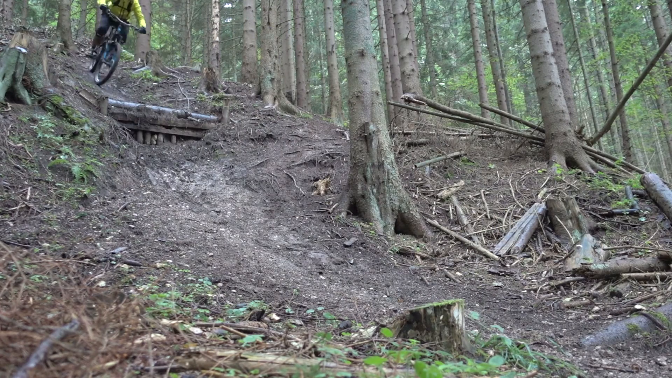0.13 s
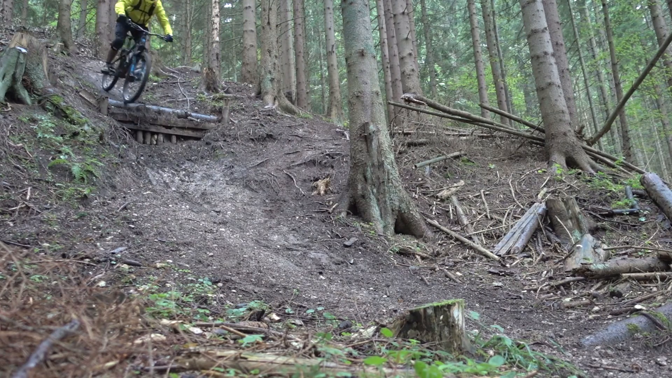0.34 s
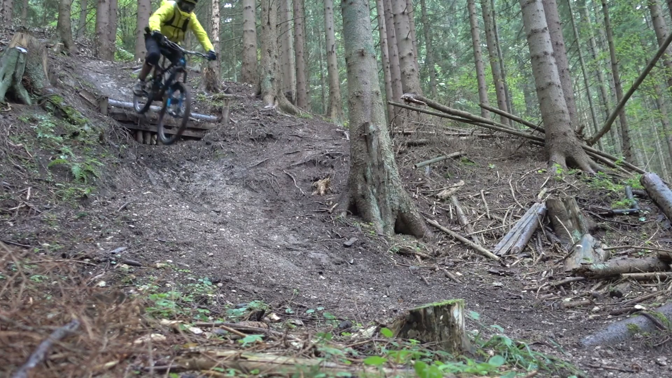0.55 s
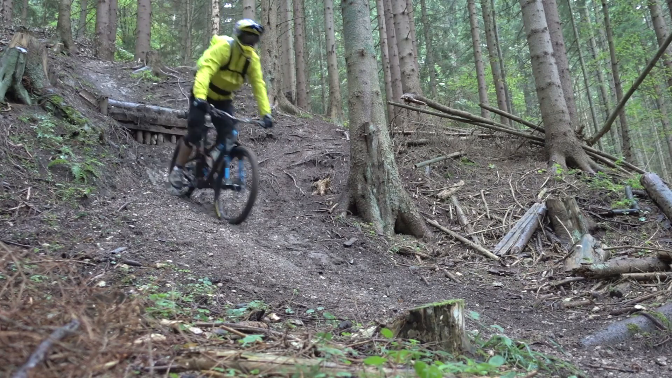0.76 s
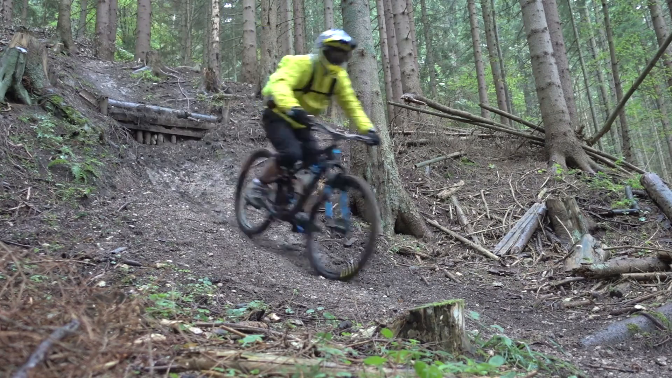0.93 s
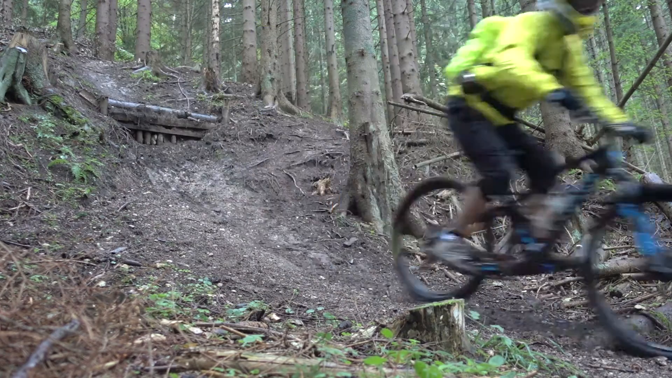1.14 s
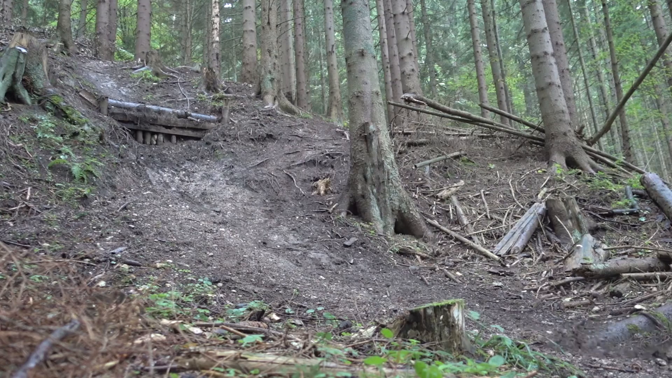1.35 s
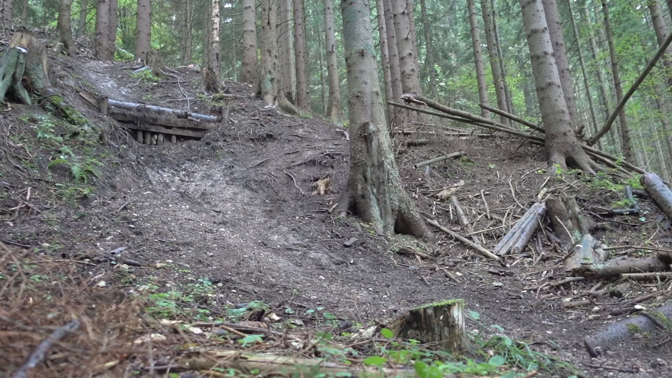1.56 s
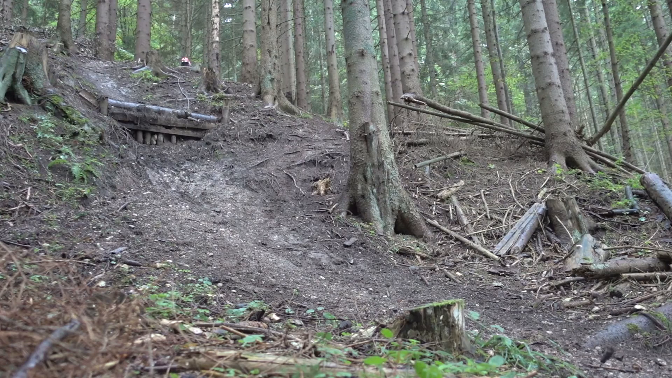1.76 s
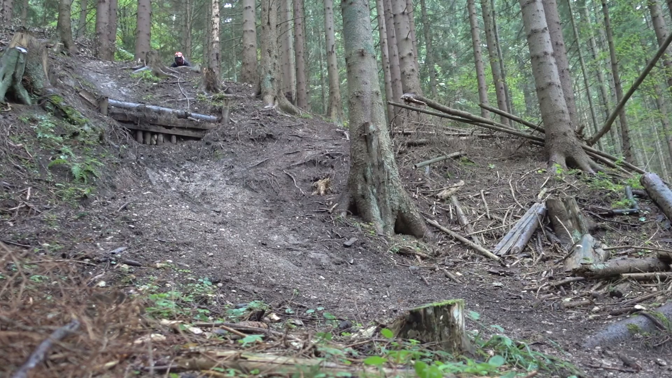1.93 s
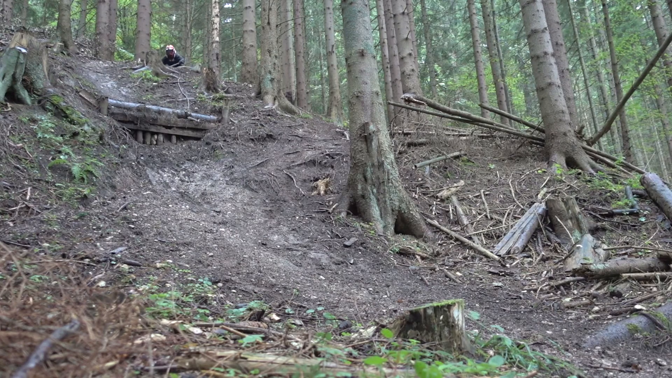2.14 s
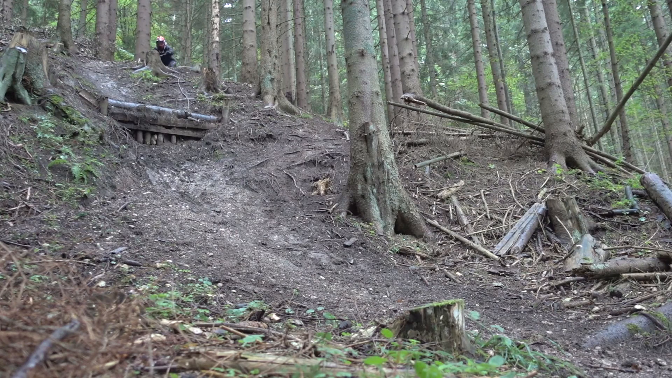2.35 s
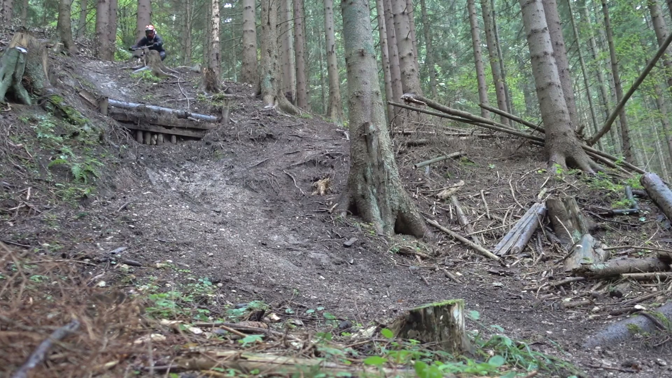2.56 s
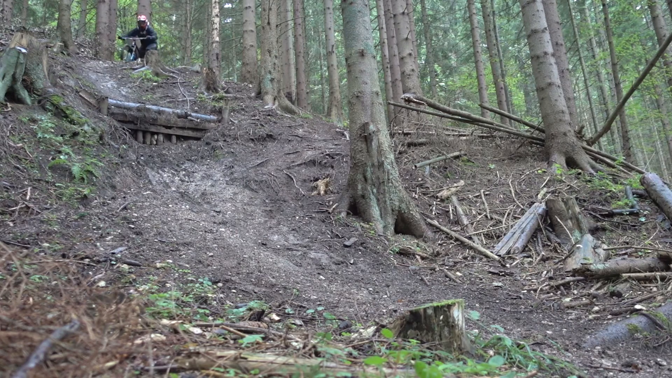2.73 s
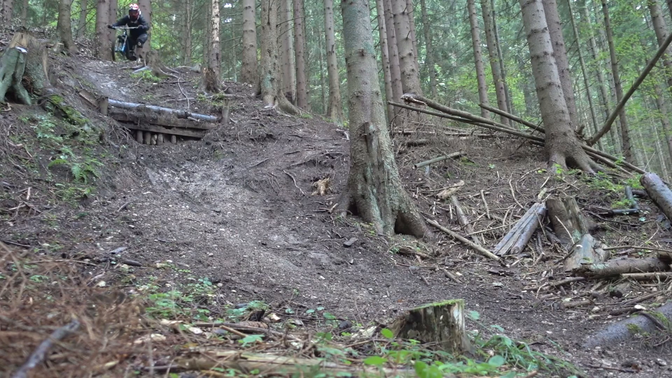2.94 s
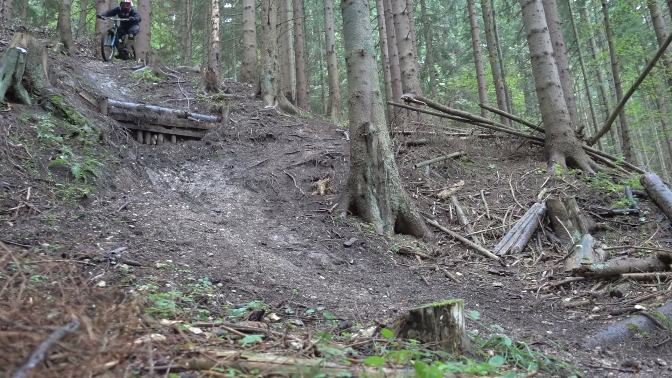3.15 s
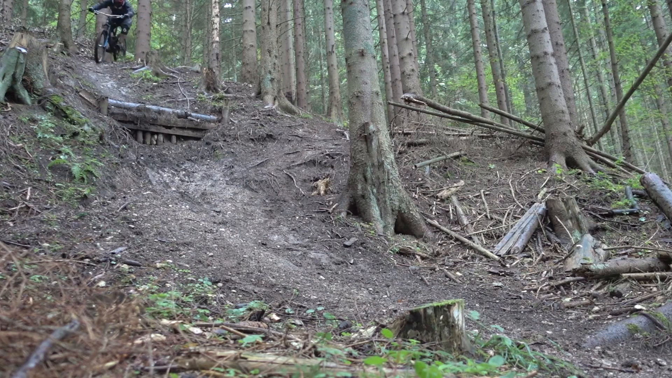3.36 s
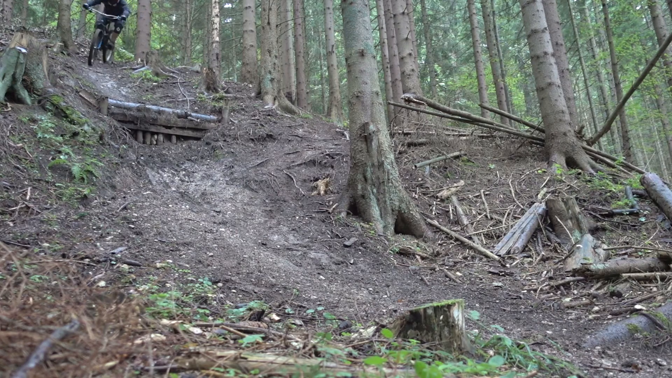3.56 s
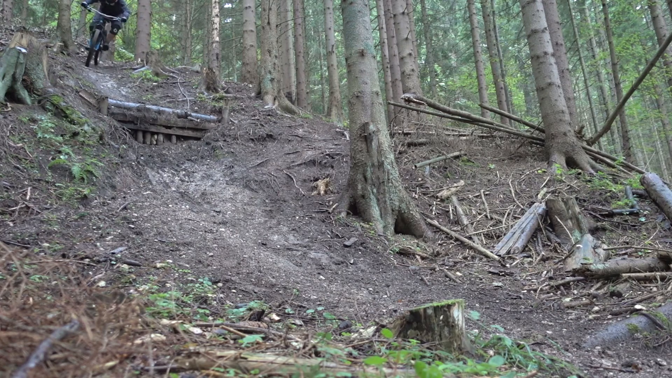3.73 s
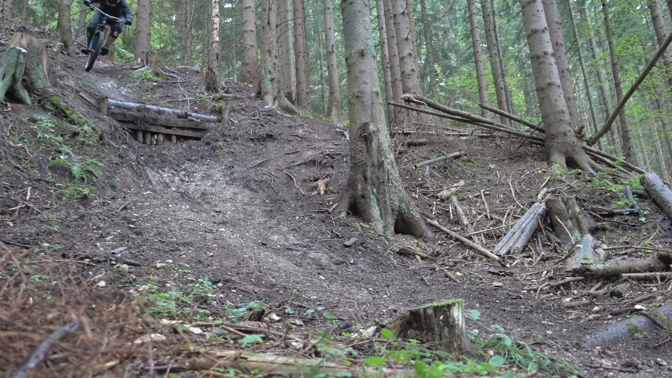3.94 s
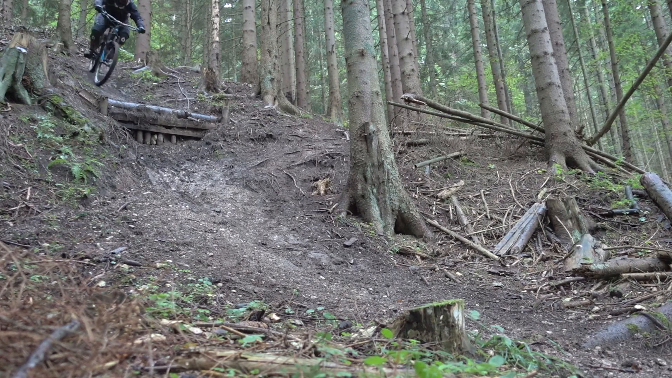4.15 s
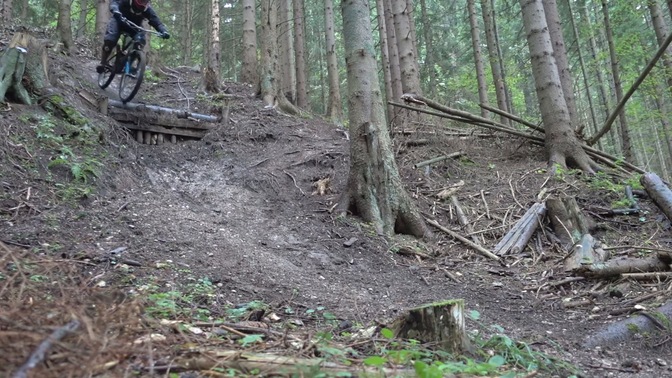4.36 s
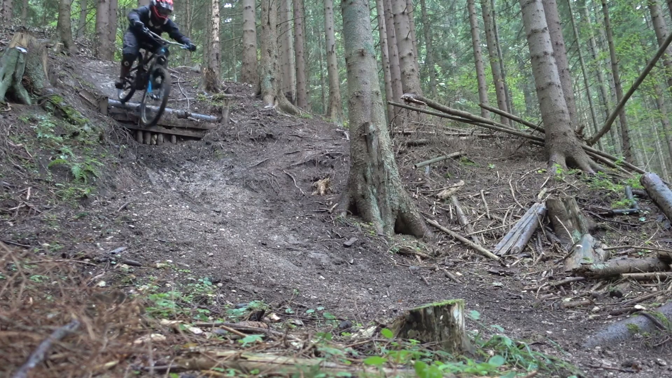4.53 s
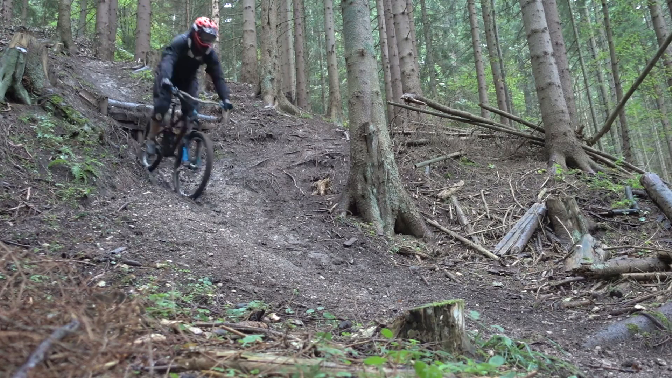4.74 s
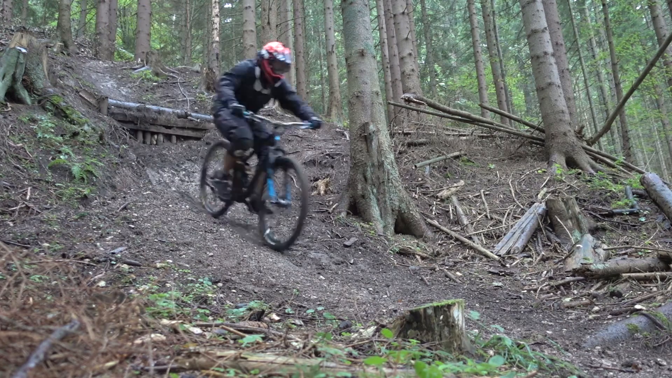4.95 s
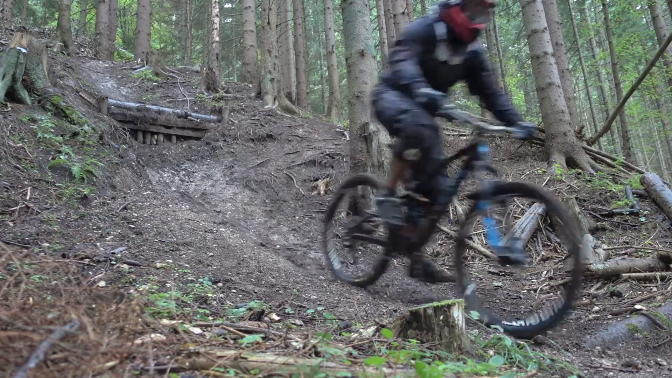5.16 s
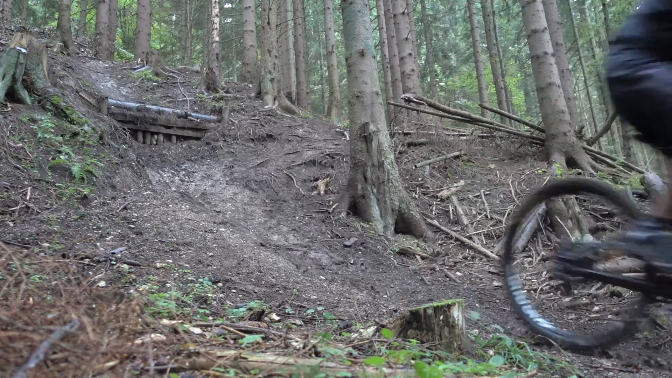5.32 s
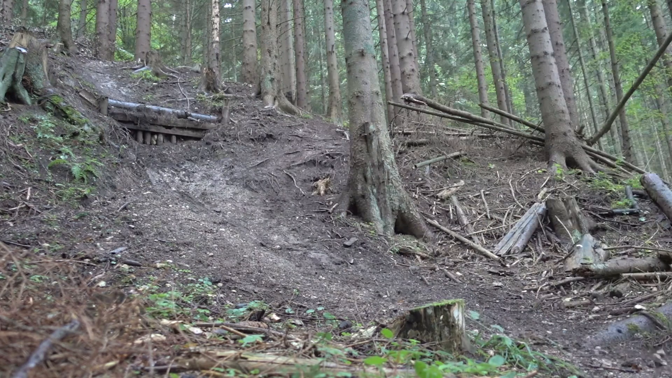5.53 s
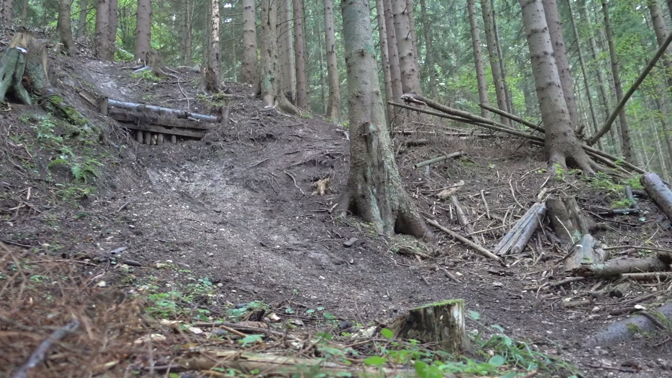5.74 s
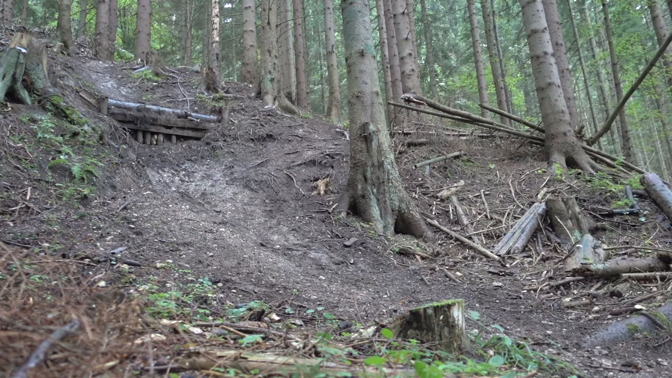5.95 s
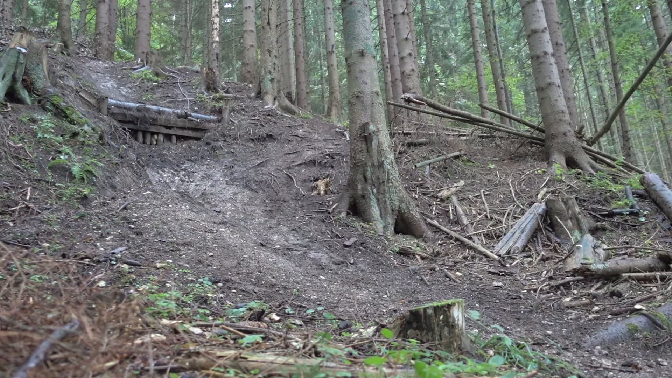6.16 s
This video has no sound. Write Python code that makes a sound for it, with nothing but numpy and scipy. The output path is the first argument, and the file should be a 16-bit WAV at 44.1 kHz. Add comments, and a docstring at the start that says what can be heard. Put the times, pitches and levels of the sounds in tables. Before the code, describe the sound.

Two mountain bikes pass in turn on a loose dirt trail among trees. Each begins as a faint even hiss, thuds down from a log step, swells into coarse crunching, spraying grit and hollow tyre drumming, then fades to the right. Metallic chain slaps, stone cracks, thin ratchet buzz and ticking dirt accompany them. Close stereo microphone, short woodland scatter, faint treetop air.

```python
"""Two mountain bikes rush past

Two bikes come down a loose forest trail, drop off a log step, land and pass from left to right.
Tyre knobs drum the casings, grit crunches and sprays; chains and frames clatter with each jolt.
Freehub sizzle flares up and fades. Nearly all of it is noise and pulses, filtered and set in level.
Rough ground and tree trunks scatter the sound back to a small stereo microphone."""
import sys
import numpy as np
from scipy import signal
from scipy.fft import rfft, irfft, next_fast_len
from scipy.io import wavfile
from scipy.ndimage import map_coordinates

SR = 44100
rng = np.random.default_rng(int(sys.argv[2]) if len(sys.argv) > 2 else 0)


def pcm_store(signal):
    """Save signal as 16-bit PCM."""
    levels = np.round(np.clip(np.atleast_2d(signal), -1, 1) * 32767)
    wavfile.write(sys.argv[1], SR, levels.astype(np.int16).T)


N = 277389
TIME = np.arange(N) / SR


def undb(db):
    """Turn decibels into a gain."""
    return 10 ** (np.asarray(db) / 20)


def unit(x):
    """Scale a sound to an rms of 1."""
    return x / np.sqrt(np.mean(x ** 2))


def colour(x, points):
    """Shape the spectrum with a minimum-phase filter drawn through (Hz, dB) points."""
    size = 2048
    hz, db = np.transpose(points)
    bins_hz = np.fft.rfftfreq(size, 1 / SR)
    log_gain = np.log(undb(np.interp(np.log(bins_hz + 1), np.log(hz), db)))
    # folding the cepstrum forward in time keeps the filter from sounding early
    fold = np.r_[1, np.full(size // 2 - 1, 2), 1, np.zeros(size // 2 - 1)]
    response = irfft(np.exp(rfft(irfft(log_gain) * fold)))
    return signal.fftconvolve(x, response)[:len(x)]


def ring(x, modes):
    """Add damped resonances of alternating sign, each filtered twice for steep skirts."""
    out = 0
    for k, (hz, width_hz, db) in enumerate(modes):
        b, a = signal.iirpeak(hz, hz / width_hz, fs=SR)
        twice = signal.lfilter(b, a, signal.lfilter(b, a, x))
        out = out + (-1) ** k * undb(db) * twice
    return out


def decay(x, decay_s):
    """Give every pulse a tail that dies away exponentially."""
    return signal.lfilter([1], [1, -np.exp(-1 / (decay_s * SR))], x)


def walk(rate):
    """Wander at random around 0 with an rms of 1, taking 'rate' new values a second."""
    return unit(np.interp(TIME * rate, np.arange(4096), rng.standard_normal(4096)))


def grains(rate, spread_db, decay_s):
    """Tiny fractures as dying puffs of noise; a positive spread makes a few big, a negative one a few faint."""
    sizes = undb(spread_db * np.minimum(rng.exponential(size=N), 4.5))
    power = (rng.random(N) < rate / SR) * sizes ** 2
    return np.sqrt(decay(power, decay_s)) * rng.standard_normal(N)


def teeth(hz, wander, scatter_db):
    """One pulse per tooth of a turning wheel, around 'hz' a second, uneven in timing and size."""
    speed_hz = hz * np.exp(wander * walk(150) + .06 * walk(4))
    turns = np.cumsum(speed_hz) / SR
    return np.diff(np.floor(turns), prepend=0) * undb(scatter_db * rng.standard_normal(N))


def burst(s, length, attack_s, release_s):
    """Rise in a straight line, hold, then die away exponentially; the length includes the rise."""
    rise = np.clip((TIME - s) / attack_s, 0, 1)
    return rise * np.exp(-np.clip((TIME - s - length) / release_s, 0, 20))


def diffuse(shape, alike_hz=1200):
    """Noise from all sides: alike at both ports in the bass, unrelated in the treble."""
    size = shape[-1]
    likeness = 1 / (1 + (np.fft.rfftfreq(size, 1 / SR) / alike_hz) ** 2)

    def share(power):
        return irfft(rfft(rng.standard_normal(shape)) * np.sqrt(power), size)

    mid, side = share((1 + likeness) / 2), share((1 - likeness) / 2)
    return np.array([mid + side, mid - side])


# The tone of the forest air. Each row: frequency in Hz, relative level in dB.
FOREST_TONE = [(25, -6), (100, -17), (200, 4), (300, 1.5), (700, 10), (1500, -0.5), (4000, -3.5),
               (15000, -4)]


def forest():
    """Faint air in the treetops: wide noise whose level wanders gently."""
    air = [unit(colour(noise[:N], FOREST_TONE)) for noise in diffuse((next_fast_len(N),))]
    return np.array(air) * undb(-51 + walk(4.2))


def trunks(x, t60_s=0.18, db=-7):
    """Trees throw back a thin noise tail that starts after 12 ms and falls 60 dB in t60_s."""
    t = TIME[:SR]
    fade = undb(-60 * t / t60_s) * (t > .012)
    responses = diffuse((SR,)) * undb(db) * fade / np.sqrt(np.sum(fade ** 2))
    return np.array([signal.fftconvolve(x, response)[:N] for response in responses])


def bank(x, ground_s=0.013):
    """Quick scatter from rough ground; the bike moves on, so each short piece gets new reflections."""
    size = 1024
    hop, t = size // 2, TIME[:size]
    starts = np.arange(0, N, hop)
    # overlapping pieces, each faded in and out
    pieces = np.pad(x, (0, size))[starts[:, None] + np.arange(size)] * signal.windows.cosine(size)
    fade = np.exp(-t / ground_s)
    responses = diffuse(pieces.shape) * fade / np.sqrt(np.sum(fade ** 2))
    scattered = irfft(rfft(pieces, 2 * size) * rfft(responses, 2 * size))
    out = np.zeros((2, N + 2 * size))
    for k, start in enumerate(starts):
        out[:, start:start + 2 * size] += scattered[:, k]
    return out[:, :N]


CLOSEST_M = 2  # from the trail to the microphone
SWING_S = 0.14  # time scale of a passing bike's swing from left to right


def ride(lands_s, closest_s, in_m_s, out_m_s):
    """One bike's run: distance loss in dB, 1 while above the step, swing from 0 (coming) to 1 (gone by)."""
    since = TIME - closest_s
    along_m = since * np.where(since < 0, in_m_s, out_m_s)
    loss_db = 10 * np.log10(1 + (along_m / CLOSEST_M) ** 2)
    above = np.clip((lands_s - TIME) / .012 + 1, 0, 1)  # fades out over 12 ms from the landing
    return loss_db, above, (1 + np.tanh(since / SWING_S)) / 2


def nearest(runs):
    """The run of whichever bike is nearer, blended as one takes over from the other."""
    weights = undb(-runs[:, :1]) ** 6
    return np.sum(weights * runs, axis=0) / np.sum(weights, axis=0)


# The two riders. Each row: landing below the step in seconds, closest pass in seconds, approach speed in m/s,
# leaving speed in m/s, rolling level in dB, extra grit level above the step in dB.
BIKE_RUNS = [(0.735, 1.207, 4.15, 6.98, -1, -4.5), (4.694, 5.364, 4.88, 6.1, 0, 1)]


def rolling(runs, law, gritty=False):
    """Power of one rolling sound from both bikes: it falls with distance and differs above the step."""
    closest_db, per_db, above_db = law
    power = 0
    for (loss_db, above, _), (*_, rider_db, grit_db) in zip(runs, BIKE_RUNS):
        step_db = above * (above_db + gritty * grit_db)
        power = power + undb(closest_db + rider_db - per_db * loss_db + step_db) ** 2
    return power


# The tone of dirt landing on dry litter. Each row: frequency in Hz, relative level in dB.
LITTER_TONE = [(3000, -25), (7000, -9), (9500, 6), (13000, -7), (16000, -3)]
PATTER_AFTER_S, PATTER_S, PATTER_FADE_S = 0.25, 0.81, 0.31  # delay after the pass, length, fade in and out
PATTER_DB = -46.5


def patter():
    """Dirt flung up by each bike comes down behind it on dry litter in fine separate ticks."""
    falling = sum(burst(closest_s + PATTER_AFTER_S, PATTER_S, PATTER_FADE_S, PATTER_FADE_S)
                  for _, closest_s, *_ in BIKE_RUNS)
    ticks = colour(grains(rate=88, spread_db=1.5, decay_s=0.00073), LITTER_TONE)
    return unit(ticks) * undb(PATTER_DB) * falling


def whirr():
    """Side knobs buzz for an instant as the first bike leans through the bend: a fast, even pulse train."""
    middle_s, half_length_s = 1.195, .03
    knobs = teeth(hz=505, wander=.015, scatter_db=2)
    buzz = colour(knobs, [(200, -24), (500, 5), (1500, 6), (3000, -13), (6000, -29), (15000, -45)])
    swell = np.exp(-((TIME - middle_s) / half_length_s) ** 4)
    return unit(buzz) * undb(-28) * swell


# Sharp clicks: stones snapping from under the tread, and the freehub catching at 5.597 s.
# Each row: start in seconds, level in dB, pitch in Hz.
SHARP_CLICKS = [(0.326, -26, 1920), (0.766, -7, 3000), (.996, -21, 7500), (1.037, -25, 11000),
                (1.062, -18, 7000), (1.164, -9, 4540), (1.197, -21, 5000), (1.2131, -15, 6170),
                (1.386, -12, 2310), (1.465, -9.5, 2230), (2.379, -19.5, 3640), (2.71, -33, 3000),
                (3.24, -36, 2700), (4.829, -6, 2560), (4.857, -10, 2620), (5.468, -9.5, 6700),
                (5.597, -13, 7900), (5.622, -16, 4500), (5.839, -39, 11000)]


def clicks(decay_s=0.0042, width_share=0.9, snap=0.2, snap_s=0.0008):
    """Pinched pebbles and a catching freehub: a dry snap of noise and a short crack from a broad resonance."""
    size = 2048
    t, out = np.arange(size) / SR, np.zeros(N + size)
    for s, db, hz in SHARP_CLICKS:
        tone = ring(rng.standard_normal(size), [(hz, hz * width_share, 0)])
        crack = unit(tone) * np.exp(-t / decay_s)
        dry_snap = snap * rng.standard_normal(size) * np.exp(-t / snap_s)
        out[int(s * SR):][:size] += (crack + dry_snap) * undb(db)
    return out[:N]


# Tyres bottoming on the earth. Each row: start in seconds, level in dB, pitch in Hz.
TYRE_THUMPS = [(0.346, -45, 232), (.815, -29, 232), (1.069, -53, 91), (2.708, -34, 313),
               (4.754, -23.5, 279), (5.191, -48, 148), (5.335, -44, 88), (5.345, -33, 170),
               (5.491, -38, 144)]


def thumps(decay_s=0.022, width_share=0.42):
    """A squashed tyre gives a dull, short boom: a dying noise burst through one resonance."""
    size = 8192
    t, out = np.arange(size) / SR, np.zeros(N + size)
    for s, db, hz in TYRE_THUMPS:
        push = rng.standard_normal(size) * np.exp(-t / decay_s)
        boom = ring(push, [(hz, hz * width_share, 0)])
        # the energy equals the given level held for decay_s
        out[int(s * SR):][:size] += boom * undb(db) * np.sqrt(decay_s * SR / np.sum(boom ** 2))
    return out[:N]


# Stretches and flare-ups of freehub sizzle; the loudest at each moment is heard.
# Each row: start in seconds, length in seconds, level at the closest point in dB.
SIZZLE_LEVELS = [(0, 0.51, -32), (0.54, 0.22, -36.5), (.98, .5, -40.5), (1.484, .8, -30),
                 (2.307, 0.41, -31.5), (2.9, .9, -32), (3.78, 2.73, -29), (4.74, 0.057, -18),
                 (4.8, .35, -32), (5.609, 0.12, -22), (5.672, 0.12, -18), (5.856, 0.0089, -17.5),
                 (5.952, 0.02, -21), (6.055, 0.017, -16), (6.155, .135, -21.5)]
SIZZLE_ATTACK_S, SIZZLE_RELEASE_S = 0.0027, 0.003
HUB_PER_DB = 1.38  # dB the sizzle drops per dB of distance loss
# The tone of the snapping pawls. Each row: frequency in Hz, relative level in dB.
PAWL_TONE = [(3000, -46), (7000, -4), (9000, -1.5), (11000, 1.5), (12000, 7.5), (13600, 3.5), (15000, 3),
             (16000, -24.5)]


def freehub(loss_db, tooth_hz=600, decay_s=0.0015, flutter_db=1.5):
    """Pawls snap over ratchet teeth hundreds of times a second, a bright metallic sizzle."""
    loudest = np.max([undb(db) * burst(s, length, SIZZLE_ATTACK_S, SIZZLE_RELEASE_S)
                      for s, length, db in SIZZLE_LEVELS], axis=0)
    snaps = teeth(hz=tooth_hz, wander=.15, scatter_db=3.0)
    sizzle = colour(decay(snaps, decay_s) * rng.standard_normal(N), PAWL_TONE)
    # the bouncing rear wheel makes the sizzle flutter
    level_db = flutter_db * walk(160) - HUB_PER_DB * loss_db
    return unit(sizzle) * loudest * undb(level_db)


# Landings and root hits that shake chain and frame. Each row: start in seconds, length in seconds,
# thud level in dB, clack level in dB.
JOLTS = [(0.325, 0.0046, -44, -38), (0.358, .01, -49, -38.5), (0.431, 0.016, -57, -35.5),
         (0.72, 0.0094, -30, -19), (0.729, 0.024, -30.5, -19), (0.758, 0.035, -34, -18),
         (0.823, 0.015, -28, -25), (0.894, 0.04, -46, -25.5), (0.97, .02, -41, -26),
         (1.007, .019, -25, -23.5), (1.06, 0.029, -27, -19), (1.129, 0.0059, -22.5, -23),
         (1.14, 0.019, -29.5, -19), (1.226, 0.018, -21.5, -18), (1.363, 0.0087, -33, -25),
         (1.388, .0024, -26.5, -19), (1.434, 0.0076, -20, -23.5), (1.462, 0.0012, -21, -14.5),
         (1.527, 0.0063, -25.5, -28.5), (1.589, 0.022, -30.5, -30), (1.783, 0.0039, -23.5, -24),
         (1.804, 0.014, -27, -20), (2.096, 0.006, -32, -32.5), (2.185, 0.012, -36, -37.5),
         (2.269, 0.0091, -34.5, -38), (2.299, 0.0054, -37, -32), (2.374, 0.008, -30.5, -30),
         (2.399, 0.016, -39.5, -38), (2.453, 0.0078, -34.5, -35.5), (2.704, 0.0035, -21.5, -22.5),
         (3.011, 0.042, -40.5, -53), (3.171, 0.049, -49, -45), (3.529, 0.0056, -46, -32),
         (3.6, 0.017, -39.5, -28), (3.668, 0.031, -38.5, -30.5), (3.784, 0.024, -37, -28.5),
         (4.023, 0.015, -38, -54), (4.153, 0.014, -31, -38), (4.311, 0.0067, -53, -30),
         (4.702, 0.039, -35.5, -22.5), (4.738, 0.012, -41, -23), (4.753, 0.0072, -21, -16.5),
         (4.825, 0.032, -46, -18.5), (4.839, 0.024, -28, -27), (5.118, 0.015, -32, -23.5),
         (5.158, 0.018, -25, -28), (5.187, 0.02, -23.5, -15), (5.227, 0.0072, -23.5, -16),
         (5.261, 0.012, -27, -16), (5.32, 0.032, -22, -19), (5.378, 0.013, -26.5, -20.5),
         (5.492, 0.0043, -19, -16.5), (5.624, 0.011, -30, -28), (5.737, 0.011, -25.5, -30),
         (5.784, 0.0069, -28, -31), (5.818, 0.017, -25, -40), (5.876, 0.0091, -22, -17.5),
         (5.93, 0.014, -20, -22), (5.95, 0.013, -21.5, -18), (5.986, 0.0034, -52.5, -11.5),
         (6.023, 0.018, -24.5, -24.5)]
# The hollow body of frame and wheels. Each row: frequency in Hz, width in Hz, relative level in dB.
BODY_MODES = [(249, 145, -7), (387, 197, -3), (585, 270, 0), (728, 69, 2), (908, 400, -4)]
# The chain against stays and sprockets. Each row: frequency in Hz, width in Hz, relative level in dB.
CHAIN_MODES = [(985, 520, -1), (1527, 500, 6.5), (1960, 790, 4.5), (2580, 1570, 3), (3260, 1370, -1.5),
               (4000, 3400, -36)]
# The tone of grit kicked up by a jolt. Each row: frequency in Hz, relative level in dB.
KICKED_TONE = [(1500, -25), (3000, 8), (4000, 10), (5200, 2), (7000, 0.5), (10000, -7.5), (16000, -22)]
# grit against the clack: close by, drop per dB of distance loss, change once past
KICK_DB, KICK_PER_DB, KICK_PAST_DB = -3.5, .5, -6


def clatter(loss_db, past, slap_rate=380, slap_s=0.0013, scatter_db=1.5, first_blow=2.2, swell_share=0.14):
    """Each jolt is a first blow and a flurry of chain slaps that ring frame and drive and kick up grit."""
    size = 4096
    tail_s, rustle = .005, .6  # fade after the jolt, steady noise under the slaps
    t, out = np.arange(size) / SR, np.zeros(N + size)
    kick_db = KICK_DB - KICK_PER_DB * loss_db + KICK_PAST_DB * past
    for s, length, thud_db, clack_db in JOLTS:
        start = int(s * SR)
        # long jolts take longer to build up than short ones
        swell = np.minimum(t / (swell_share * length), 1)
        shaking = swell * np.exp(-np.maximum(t - length, 0) / tail_s)
        slaps = (rng.random(size) < slap_rate / SR) * undb(scatter_db * rng.standard_normal(size))
        slaps[0] = first_blow
        contact = decay(slaps, slap_s) + rustle
        force = shaking * contact * rng.standard_normal((3, size))
        layers = [(ring(force[0], BODY_MODES), thud_db),
                  (ring(force[1], CHAIN_MODES), clack_db),
                  (colour(force[2], KICKED_TONE), clack_db + kick_db[start])]
        # the energy equals the given level held for the jolt and half its tail
        held = (length + tail_s / 2) * SR
        for sound, db in layers:
            out[start:][:size] += sound * undb(db) * np.sqrt(held / np.sum(sound ** 2))
    return out[:N]


# How the rolling sounds change along the trail. Each holds: level at the closest point in dB,
# drop in dB per dB of distance loss, change above the step in dB.
CRUNCH_ROLL = (-25.5, 1.233, -0.16)
SPRAY_ROLL = (-27.5, 1.53, -0.95)
THRUM_ROLL = (-32.5, 1.38, -20)
DRONE_ROLL = (-41, 1.35, -6.5)
RUMBLE_ROLL = (-56, 1.7, -10)
# Tyres bite and slide on landings and loose or rutted ground. Each row: start in seconds, length in seconds,
# crunch level in dB, casing thrum level in dB, sprayed dirt level in dB.
TYRE_SKIDS = [(0.34, 0.17, -45, -59, -41), (0.713, 0.14, -20.5, -38, -29), (0.883, 0.12, -27, -36, -35),
              (2.266, 0.19, -46, -42.5, -44.5), (2.715, 0.14, -38.5, -46, -43.5),
              (2.985, 0.22, -47, -44.5, -56), (3.672, 0.16, -34, -47, -64), (4.282, 0.93, -36.5, -65, -34),
              (4.619, 0.11, -29, -44, -36), (4.719, 0.15, -18, -30, -25), (4.912, 0.068, -24.5, -53, -32),
              (5.367, 0.073, -34, -58, -19.5), (5.64, 0.12, -29, -35, -54), (5.773, 0.27, -32, -32.5, -62),
              (6.108, 0.053, -30.5, -34, -58)]
SKID_ATTACK_S, SKID_RELEASE_S = .012, 0.042
RUT_DRONE_DB = -15  # knob drone on rutted ground, against the casing thrum
# The wheels leave the ground and the rolling lets up. Each row: start in seconds, length in seconds.
WHEEL_HOPS = [(0.522, 0.34), (1.328, 0.024), (2.61, 0.083), (4.42, 0.13), (5.525, 0.037), (5.793, 0.055),
              (5.882, 0.041), (6.108, 0.04)]
HOP_EDGE_S, HOP_GRIT_DB, HOP_CASING_DB = 0.0088, -3, -2.5  # how fast, and how far grit and casing drop
# The tyre casing's resonances. Each row: frequency in Hz, width in Hz, relative level in dB.
CASING_MODES = [(298, 55, -2), (434, 218, 2.5), (550, 170, 8), (633, 470, 3.5)]
# The tones of crushed grit, flying dirt and low rumble. Each row: frequency in Hz, relative level in dB.
CRUNCH_TONE = [(300, -35), (700, -19.5), (1150, -4.5), (1550, 0), (2000, 1.5), (2450, 3.5), (3000, 0),
               (3700, -2), (4500, -5), (7000, -17.5), (15000, -30)]
SPRAY_TONE = [(1500, -35), (3200, -6.5), (4500, 3.5), (6000, 1), (9000, -4.5), (12000, -7.5), (16000, -7)]
RUMBLE_TONE = [(20, -27), (60, 14), (120, 17), (200, 17), (400, -59), (2000, -81)]


def tyres(runs, smooth_db=-46, rough_db=-26):
    """Knobs drum the casing and crush the grit; bumps in the trail load all of it together."""
    # powers of the skids, then power factors for the hops
    slide, ruts, dirt = sum(np.outer(undb(dbs), burst(s, length, SKID_ATTACK_S, SKID_RELEASE_S)) ** 2
                            for s, length, *dbs in TYRE_SKIDS)
    airborne = sum(burst(s, length, HOP_EDGE_S, HOP_EDGE_S) for s, length in WHEEL_HOPS)
    grip, weight = undb(HOP_GRIT_DB * airborne) ** 2, undb(HOP_CASING_DB * airborne) ** 2
    crunch_db, spray_db, thrum_db, drone_db, rumble_db = 10 * np.log10([
        grip * rolling(runs, CRUNCH_ROLL, gritty=True) + slide,
        grip * rolling(runs, SPRAY_ROLL, gritty=True) + dirt,
        weight * rolling(runs, THRUM_ROLL) + ruts,
        weight * rolling(runs, DRONE_ROLL) + ruts * undb(RUT_DRONE_DB) ** 2,
        weight * rolling(runs, RUMBLE_ROLL)])
    # close by, single grains and bumps stand out; far off they merge into an even hiss
    close = np.clip((crunch_db - smooth_db) / (rough_db - smooth_db), .15, 1)
    load = np.tanh(walk(55)) * close

    def merge(grit):
        return np.sqrt(close) * unit(grit) + np.sqrt(1 - close) * rng.standard_normal(N)

    crunch = merge(grains(rate=3400, spread_db=1.5, decay_s=0.00024))
    spray = merge(grains(rate=4000, spread_db=-2.5, decay_s=0.00016))
    knobs = unit(teeth(hz=225.0, wander=.22, scatter_db=4.5)) + 0.88 * rng.standard_normal(N)
    layers = [(colour(crunch, CRUNCH_TONE), crunch_db + 2.0 * load),
              (colour(spray, SPRAY_TONE), spray_db + 3.2 * load),
              (ring(knobs, CASING_MODES), thrum_db + 3.2 * load),
              (ring(knobs, [(216.0, 115, 0)]), drone_db + 0.74 * load),
              (colour(rng.standard_normal(N), RUMBLE_TONE), rumble_db + 2.1 * load)]
    return sum(unit(sound) * undb(db) for sound, db in layers)


PORT_LAG_S = .0001  # travel time of sound between the two microphone ports
BEARING_IN, BEARING_OUT = -0.29, 0.89  # -1 left to 1 right
SHADE_DB, SHADE_FADE_DB = -6, 21  # left minus right once past; distance loss over which it fades
# echo against direct sound: close by, rise per dB of distance loss, change above the step, change once past
ECHO_DB, ECHO_PER_DB, ECHO_ABOVE_DB, ECHO_PAST_DB = -3.5, 0.86, 2.5, -4.5
# The tone of the echo. Each row: frequency in Hz, gain in dB.
ECHO_TONE = [(60, -22), (200, -14.5), (500, -12.5), (1500, -3.5), (5000, -3), (15000, 3)]


def scene():
    """The passing bikes reach the nearer port earlier and louder; far off, the echo takes over."""
    runs = np.array([ride(*rider[:4]) for rider in BIKE_RUNS])
    loss_db, above, swing = nearest(runs)
    past = np.clip(2 * swing - 1, 0, 1)
    bikes = patter() + whirr() + clicks() + thumps() + freehub(loss_db) + clatter(loss_db, past) + tyres(runs)

    # a small time shift for each port
    bearing = BEARING_IN + (BEARING_OUT - BEARING_IN) * swing
    direct = np.array([map_coordinates(bikes, [(TIME + side * bearing * PORT_LAG_S / 2) * SR], order=3)
                       for side in (-1, 1)])
    echo = undb(ECHO_DB + ECHO_PER_DB * loss_db + ECHO_ABOVE_DB * above + ECHO_PAST_DB * past)
    thrown = colour(bikes * echo, ECHO_TONE)
    # more echo leaves less room for the direct sound
    ports = (direct + bank(thrown) + trunks(thrown)) / np.sqrt(1 + echo ** 2)

    # the housing shades the far port, mostly in the middle range; the near port gains as much
    shade_db = SHADE_DB * np.sqrt(swing) * np.exp(-loss_db / SHADE_FADE_DB)
    band = signal.butter(1, [380, 8000], "band", fs=SR, output="sos")
    middle = signal.sosfiltfilt(band, ports)
    shaded = ports + middle * (undb(np.array([shade_db, -shade_db]) / 2) - 1)
    return shaded + forest()


TOP_HZ = 15750  # where the treble is cut off


def record(dry):
    """Bend the highest peaks smoothly toward a ceiling of 0.9, then cut the top with a steep filter."""
    rounded = dry / (1 + (dry / .9) ** 4) ** .25
    return signal.sosfilt(signal.ellip(10, .2, 80, TOP_HZ, fs=SR, output="sos"), rounded)


dry = scene()
out = record(dry)
pcm_store(out)
```